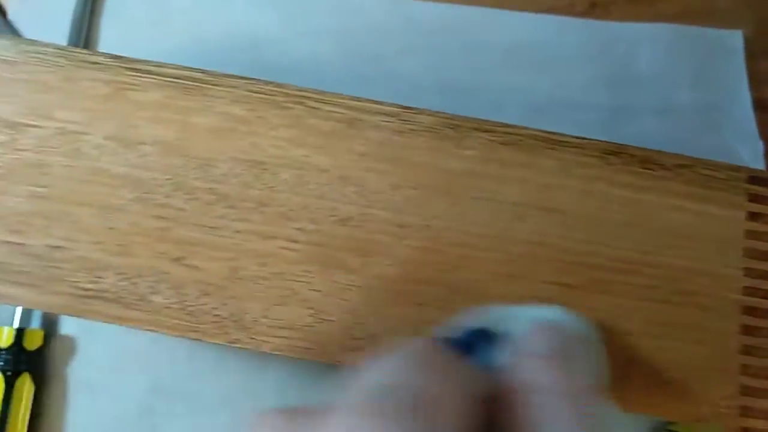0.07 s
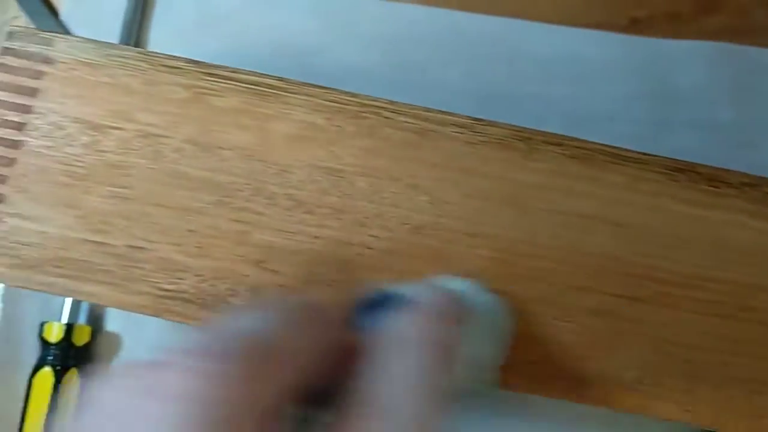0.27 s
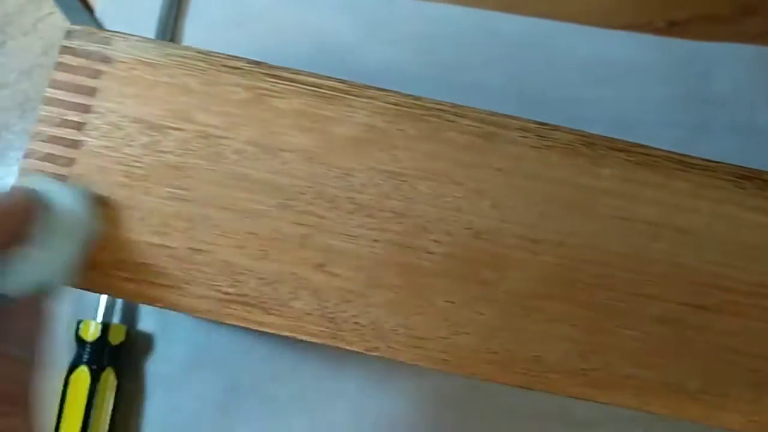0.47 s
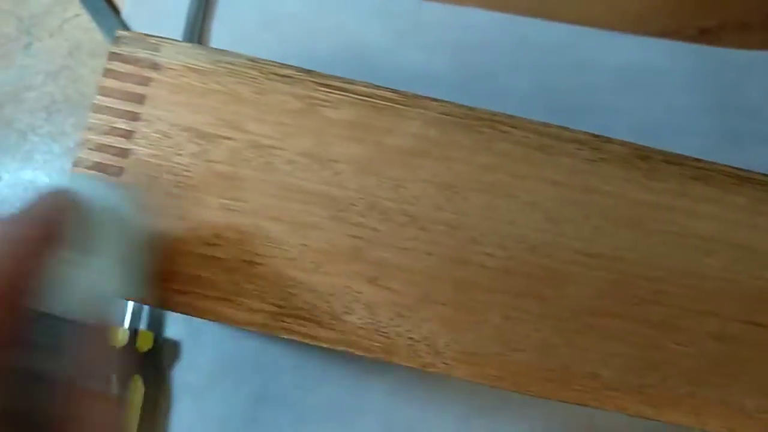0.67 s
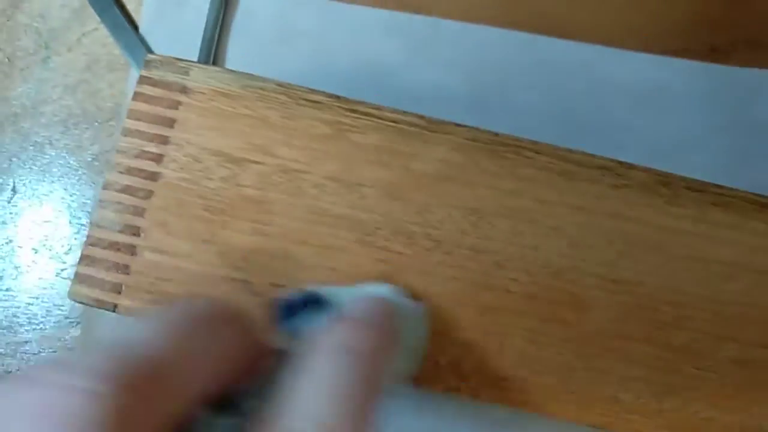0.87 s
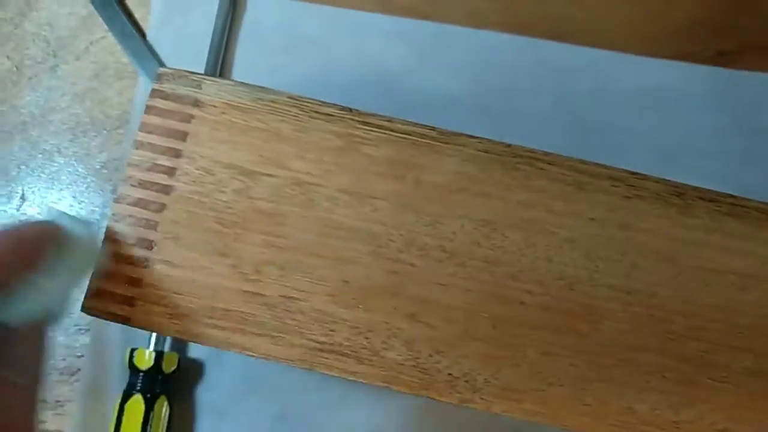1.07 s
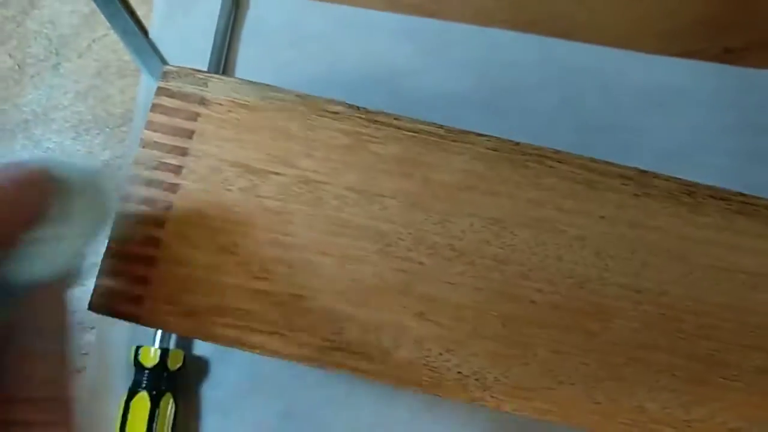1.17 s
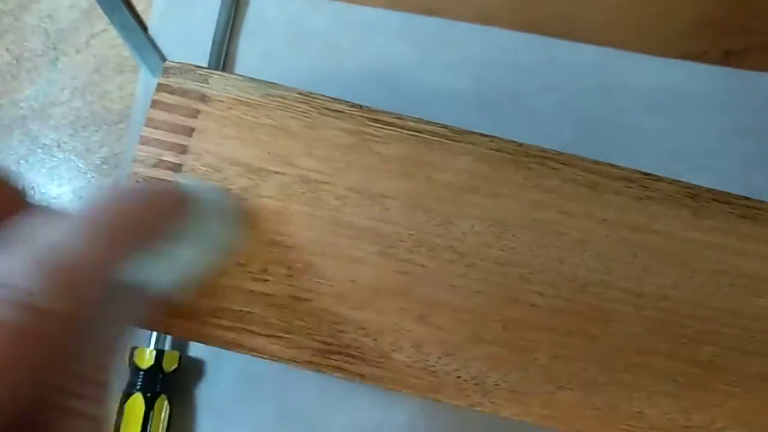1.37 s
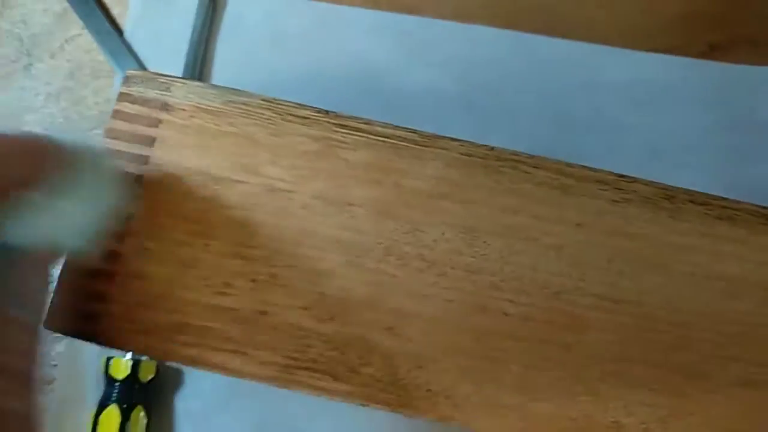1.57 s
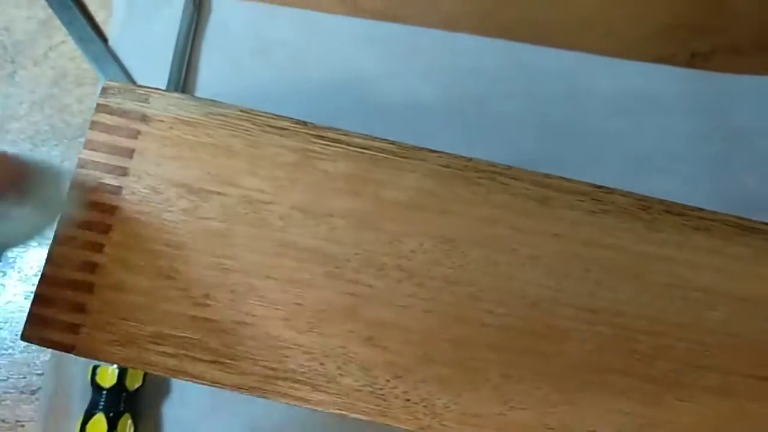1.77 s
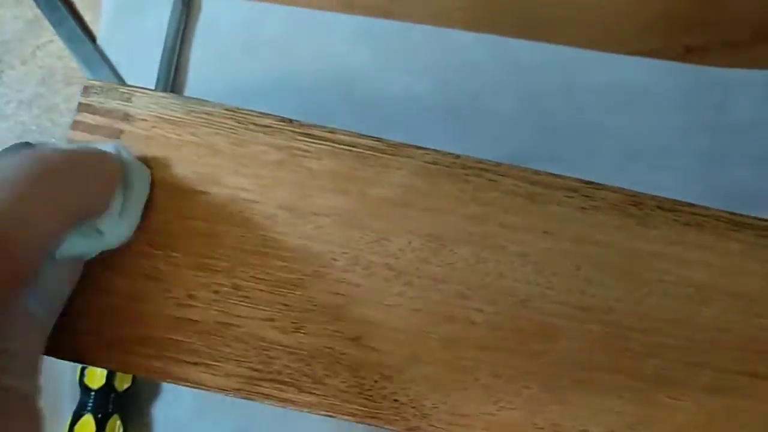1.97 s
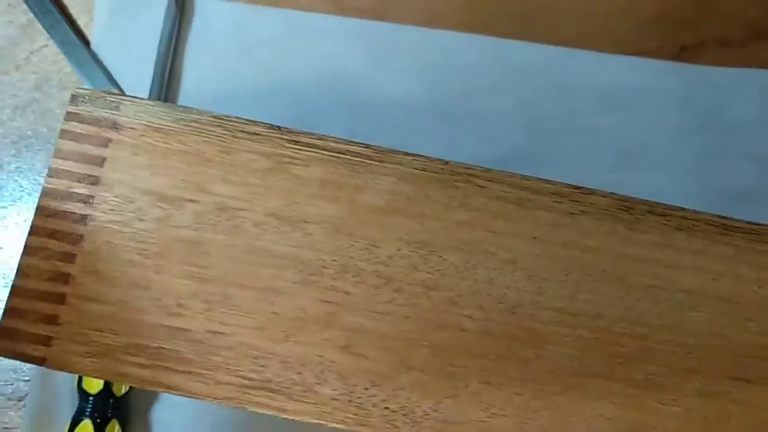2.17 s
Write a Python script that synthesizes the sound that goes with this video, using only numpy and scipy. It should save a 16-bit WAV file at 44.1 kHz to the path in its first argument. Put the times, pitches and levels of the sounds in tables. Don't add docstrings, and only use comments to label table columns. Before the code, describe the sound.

Cloth wiping over wood: two long soft swishes, then short brisk ones with tiny clicks

```python
import sys
import numpy as np
from scipy import signal
from scipy.fft import rfft, irfft, next_fast_len
from scipy.io import wavfile
from scipy.ndimage import uniform_filter1d, map_coordinates

SR = 44100
rng = np.random.default_rng(int(sys.argv[2]) if len(sys.argv) > 2 else 0)


def put_to_file(sound):
    columns = np.atleast_2d(sound).T
    safe = np.clip(columns, -1, 1)
    whole_steps = np.round(safe * 32767)
    wavfile.write(sys.argv[1], SR, whole_steps.astype(np.int16))


def nominal_scale(level):
    x = np.asarray(level, float) / 20
    return 10 ** x


N = 98475


def level(x, db):
    return x * nominal_scale(db) / np.sqrt(np.mean(x ** 2))


def colour(x, points):
    size = next_fast_len(N + 4096)
    hz, db = np.array(points, float).T
    f = np.maximum(np.arange(size // 2 + 1) * SR / size, 1)
    gain_db = np.interp(np.log(f), np.log(hz), db, left=-70, right=-70)
    return irfft(rfft(x, size) * nominal_scale(gain_db), size)[:N]


def band(x, hz, width_hz):
    b, a = signal.iirpeak(min(hz, .45 * SR), hz / width_hz, fs=SR)
    return signal.lfilter(b, a, x)


def gliding(x, hz, width_hz, order=1):
    turn = np.exp(2j * np.pi * np.cumsum(hz) / SR)
    b, a = signal.butter(order, width_hz / 2, fs=SR)
    return 2 * np.real(turn * signal.lfilter(b, a, x / turn))


def walk(rate):
    hold = int(SR / rate)
    steps = np.repeat(rng.standard_normal(N // hold + 1), hold)
    return 1.74 * uniform_filter1d(uniform_filter1d(steps, hold), hold)[:N]


def shop_air():
    # (frequency [Hz], level [dB per Hz])
    air_spectrum = [(24, -9), (45, -3.5), (260, -7.5), (600, -10.5), (2400, -16), (5500, -18.5),
                    (12000, -17), (16500, -18.5)]
    t = np.arange(N) / SR
    air = level(colour(rng.standard_normal(N), air_spectrum), -64.5)
    swell_db, fade_db_per_s = 0.4, 2
    bass_gain = nominal_scale(swell_db * walk(2.7) + fade_db_per_s * (1 - t))
    return air + (bass_gain - 1) * band(air, 320, 450)


def fan():
    # (frequency [Hz], width [Hz], level [dB])
    fan_tones = [
        (130, 18, -88),
        (265, 22, -84.5),
        (600, 28, -81),
    ]
    return sum(level(band(rng.standard_normal(N), hz, width_hz), db) for hz, width_hz, db in fan_tones)


def mains_hum():
    hz = 50 * (1 + .02 * walk(6.5))
    hum = np.sin(2 * np.pi * np.cumsum(hz) / SR) * nominal_scale(1.5 * walk(10))
    return level(hum, -74.5)


def phone_hiss():
    return level(band(rng.standard_normal(N), 9400, 3000), -70.5)


def thread_ticks():
    # (time [s], peak level [dB], pitch [Hz])
    snaps = [(.7154, -49, 8500), (.7283, -48, 8500), (.7893, -53, 9000), (0.8954, -42, 7900),
             (.9356, -50, 8500), (1.381, -49, 8400), (1.402, -51, 9220), (1.449, -47, 8900),
             (1.6289, -51, 9000), (1.961, -44, 10500), (1.9953, -53, 9000), (2.0388, -47, 11800),
             (2.1276, -52, 9000)]
    t60_s = 0.0068
    out, t = np.zeros(N + 1300), np.arange(1300) / SR
    for s, db, hz in snaps:
        burst = rng.standard_normal(len(t)) * nominal_scale(-60 * t / t60_s) + 3.0 * (t == 0)
        pitched = band(band(burst, hz, hz / 7), hz, hz / 7)
        burst = pitched + 0.31 * band(burst, 8000, 9000) + .3 * band(burst, 2200, 900)
        start = int(s * SR)
        out[start:start + len(t)] += burst / abs(burst).max() * nominal_scale(db)
    return out[:N]


def grain_snags():
    # (time [s], peak level [dB])
    snags = [(.0297, -27), (.4488, -34), (.6767, -35), (1.0134, -35), (1.1642, -25), (1.5703, -36),
             (1.8411, -26), (1.8612, -29), (1.9059, -33), (1.9116, -25), (1.9339, -32), (2.172, -37),
             (2.1964, -26), (2.2252, -24.5)]
    out, t = np.zeros(N + 1300), np.arange(1300) / SR
    impulse = 1. * (t == 0)
    click = band(impulse, 8800, 3500) + 0.47 * band(impulse, 2700, 2500)
    for s, db in snags:
        start = int(s * SR)
        out[start:start + len(t)] += click / abs(click).max() * nominal_scale(db)
    return out[:N]


def fibre_slips():
    slips_per_s, spread_db, top_db, grip_db = 14000, 1.5, 14, 0.26
    hit = rng.random(N) < slips_per_s / SR
    size_db = np.minimum(spread_db * rng.exponential(size=N), top_db)
    grip = grip_db * walk(150).clip(-3, 1.8)
    return hit * nominal_scale(size_db + grip) * np.sign(rng.standard_normal(N))


def board_ring(force):
    # (time [s], frequency [Hz])
    ring_pitch = [(0, 2220), (.168, 2050), (.27, 2200), (.33, 2270), (.526, 2110), (.6, 2150), (.7, 2300),
                  (.95, 2160), (1.056, 2080), (1.142, 2200), (1.24, 2140), (1.46, 2370), (1.5, 2290),
                  (1.86, 2280), (1.95, 2130), (2.07, 2180), (2.233, 2210)]
    t = np.arange(N) / SR
    hz = np.interp(t, *np.array(ring_pitch).T)
    wide = level(gliding(force, hz, 400, order=2), 0)
    slim = level(gliding(force, hz, 190, order=2), 0)
    at_end = np.clip((t - 1.11) / .04, 0, 1)
    flicker_db = 2.5 * walk(39.97)
    ring = ((1 - at_end) * wide + at_end * slim) * nominal_scale(flicker_db)
    skirt = band(band(force, 1716, 1360), 1716, 1360)
    ring_db, skirt_db = -7.5, -9
    return level(ring, ring_db) + level(skirt, ring_db + skirt_db)


def stroke_gains():
    # (time [s], level [dB], board pressure [dB], board ring [dB], fine hiss [dB])
    long_wipes = [
        [(0, -41.5, -12.5, -15, -2), (.014, -39.5, -11.5, -26, -2), (.068, -35, -12.5, -12, -10.5),
         (.15, -39.5, -7.5, -11, -1), (.19, -38.5, -9, -21, -4.5), (.245, -42, -12, -11.5, -9),
         (.27, -51.5, -6.5, -17, -10), (.29, -63, -10, -6, -8)],
        [(.29, -64, -7, -12, -8), (.312, -60.5, -5, -3, -6), (.336, -47.5, -6.5, 1.5, -4.5),
         (.43, -41.5, -8.5, -9, -8.5), (.51, -40.5, -6.5, -3, -4), (.59, -39.5, -7.5, -18, -10),
         (.676, -43, -8.5, -17, -14), (.71, -57.5, -9, -13, -12), (.77, -79, -6, -10, -8)],
    ]
    short_wipe = [
        [(1.0, -55, -6, -8, -5), (1.012, -42.5, -9, -15, -4), (1.05, -41, -10.5, -7, -3),
         (1.1, -39, -9, -14.5, -4), (1.15, -38, -10, -8.5, -9.5), (1.19, -35.5, -8.5, -17, -11.5),
         (1.22, -43, -10.5, -9, -9), (1.25, -57.5, -11, -3, -16), (1.3, -72, -11, -7, -8)],
    ]
    flicks = [
        [(1.44, -69, -2.5, -10, -4), (1.478, -43, -3.5, -14, -8), (1.522, -37, 0, -18, -12),
         (1.556, -33.5, -5, -19, -14), (1.588, -43, -7, -20, -9), (1.6, -56, -11, -9, -12),
         (1.66, -71, -9, -5, -5)],
        [(1.805, -67, -5, -15, -13), (1.834, -45.5, -3, -14, -10), (1.852, -36.5, -2.5, -7, -12),
         (1.88, -33, -1, -8, -14), (1.912, -35, -8, -13, -11.5), (1.932, -40, -5, -31, -12),
         (1.943, -51.5, -20, -6, -9), (2.0, -72, -7, 1, -10)],
        [(2.14, -60, -4, -8, -16), (2.165, -49.5, -1, -14, -14), (2.172, -41, -1.5, -15, -15),
         (2.21, -33, -6.5, -14, -14), (2.233, -40, -9.5, -20, -10)],
    ]
    grazes = [
        [(.86, -69, -12, -7, -8), (.89, -64, -2, -1, -10), (.92, -68, -5, -10, -16), (.933, -54.5, -5, -16, -4),
         (.95, -61, -5, -9, -6), (1.0, -57.5, -4.5, -5, -10)],
        [(1.32, -72, -12, -12, -4), (1.374, -68, -8, -12, -10), (1.38, -62, -5.5, -10, -10),
         (1.404, -69, -5, -9, -10), (1.415, -76, -4, -12, -10)],
        [(1.766, -85, -4, -13, -8), (1.774, -61, -4.5, -17, -13), (1.82, -59.5, -6, -15, -12)],
        [(2.066, -82, -12, -10, -14), (2.071, -49, -9.5, -20, -12), (2.088, -46.5, -9, -8, -14),
         (2.1, -51.5, -7, -8, -13), (2.14, -61.5, -5, -15, -13)],
    ]
    t = np.arange(N) / SR
    power = np.zeros((4, N))
    for rows in long_wipes + short_wipe + flicks + grazes:
        s, db, *shares_db = np.array(rows, float).T
        stroke_db = np.interp(t, s, db, left=-120, right=-120)
        parts_db = np.array([0 * t] + [np.interp(t, s, share) for share in shares_db])
        power += nominal_scale(stroke_db + parts_db) ** 2
    return np.sqrt(uniform_filter1d(power, size=90, axis=1).clip(0))


def grain_patches(x):
    spec, f = rfft(x), np.arange(N // 2 + 1) * SR / N
    out = np.zeros(N)
    for centre_hz in 100 * 2 ** np.arange(0, 7.5, .2):
        octaves_off = abs(np.log2(f + 1) - np.log2(centre_hz))
        window = np.clip(1 - octaves_off / .2, 0, 1)
        out += irfft(spec * window, N) * nominal_scale(.5 * walk(18))
    return out


def cloth_folds(x):
    # (time [s], length [s], frequency [Hz], width [Hz], level [dB])
    fold_moves = [(-.06, 0.15, 12900, 2200, -7), (.21, 0.074, 12900, 2000, 4.5),
                  (0.236, 0.054, 3180, 1500, 1), (.32, 0.1, 3450, 500, 4), (.32, .12, 8000, 1200, 4.5),
                  (0.537, 0.097, 3000, 900, -2), (1.0, 0.091, 12200, 1600, -0.5),
                  (1.832, 0.064, 5400, 1600, -6.5), (1.846, .07, 4260, 500, 3),
                  (1.858, 0.094, 1680, 500, -4.5), (2.07, 0.06, 12000, 2400, -9),
                  (2.065, .05, 14600, 700, 3), (2.068, 0.063, 5500, 2000, 4.5), (2.15, .06, 11900, 1400, 3),
                  (.33, .14, 12400, 1400, 3), (1.793, 0.064, 7300, 800, 5.5),
                  (2.075, 0.041, 2200, 300, 4.5), (1.843, .08, 800, 800, -3), (.1, .1, 3000, 1000, -2),
                  (1.5, .08, 2100, 600, -2)]
    t, out = np.arange(N) / SR, x.copy()
    for s, length, hz, width_hz, db in fold_moves:
        swell = np.abs(np.sin(np.pi * np.clip((t - s) / length, 0, 1))) ** .5
        out += (nominal_scale(db) - 1) * swell * band(x, hz, width_hz)
    return out


def cupped_fingers(rub):
    # (time [s], cupping [0-1], hollow resonance [Hz])
    cupping = [(0, 0.8, 10600), (.12, 0.26, 10700), (.22, 0.7, 10740), (.33, 1, 10400), (.42, 0.93, 10440),
               (.53, 0, 10500), (.62, 0.2, 10700), (1.0, .7, 10500), (1.1, 0.2, 10700), (1.16, 0.37, 10700),
               (1.5, 0.28, 10600), (1.86, 0.2, 10600), (2.233, 0.28, 10500)]
    t = np.arange(N) / SR
    s, share, hz = np.array(cupping).T
    cup, hollow_hz = np.interp(t, s, share).clip(0, 1), np.interp(t, s, hz)
    hollow = nominal_scale(4) * gliding(rub, hollow_hz, 500, order=2)
    shade = 0.48 * band(rub, 6200, 2700)
    notch = 0.37 * gliding(rub, 0.92 * hollow_hz, 410)
    return rub + cup * (hollow - shade - notch)


def hand_echo(rub):
    delay_s, move_s, echo_db = 0.000592, .00002, -19.5
    late = np.arange(N) - (delay_s + move_s * walk(5.8)) * SR
    echo = map_coordinates(rub, [late], mode="nearest")
    return (rub + nominal_scale(echo_db) * echo) / np.sqrt(1 + nominal_scale(echo_db) ** 2)


def cloth():
    # (frequency [Hz], level [dB per Hz])
    board_spectrum = [(110, -27), (450, -21), (1300, -14), (1900, -3), (2900, 1.5), (4300, -1), (5800, -2),
                      (8000, -12)]
    weave_spectrum = [(4000, -19.5), (6300, -10), (7600, -6), (8900, -2), (9700, -2.5), (10500, -7),
                      (11500, -9), (13000, -46)]
    fine_spectrum = [(9500, -25), (11400, -5), (12500, -0.5), (14500, 0.5), (15800, -6)]
    force = fibre_slips()
    board = level(colour(force, board_spectrum), 0)
    ring = board_ring(force)
    weave = level(colour(fibre_slips(), weave_spectrum), -1.67)
    fine = level(colour(fibre_slips(), fine_spectrum), 0)
    rub = np.sum(stroke_gains() * [weave, board, ring, fine], axis=0)
    rub = cloth_folds(grain_patches(rub))
    return hand_echo(cupped_fingers(rub))


def room_tail(near):
    t60_s, tail_db = 0.15, -17.5
    t = np.arange(SR // 3) / SR
    tail = band(rng.standard_normal(len(t)), 7100, 10000) * nominal_scale(-60 * t / t60_s) * (t > .003)
    return nominal_scale(tail_db) * signal.fftconvolve(near, tail / np.sqrt(np.sum(tail ** 2)))[:N]


def scene():
    shop = shop_air() + fan() + mains_hum() + phone_hiss()
    near = cloth() + thread_ticks() + grain_snags()
    mid = near + room_tail(near) + shop
    return np.array([mid, mid])


def roll_off(x):
    return signal.sosfilt(signal.butter(12, 16220, fs=SR, output="sos"), x)


def record(dry):
    # (time [s], length [s], frequency [Hz], width [Hz], level under the sound [dB])
    side_patches = [(0.603, 0.045, 9950, 1490, -3), (0.61, .04, 11600, 1400, -2),
                    (1.083, 0.042, 5370, 1780, -5.5), (1.303, .04, 5000, 1500, -3),
                    (1.303, .04, 7300, 2000, -3), (1.653, .04, 9700, 1500, -3),
                    (1.73, 0.048, 6300, 1200, -3), (1.73, 0.047, 8300, 1400, -6),
                    (1.73, 0.049, 11800, 1400, -4), (1.73, 0.05, 13800, 1500, -7)]
    t = np.arange(N) / SR
    top_cut = signal.ellip(10, .2, 70, 15800, fs=SR, output="sos")
    x = signal.sosfilt(top_cut, dry * np.clip(t / 0.0023, 0, 1))
    delayed = np.roll(x[0], 300)
    side = np.zeros(N)
    for s, length, hz, width_hz, db in side_patches:
        edges_hz = [hz - width_hz / 2, hz + width_hz / 2]
        sos = signal.butter(6, edges_hz, "bandpass", fs=SR, output="sos")
        gate = np.clip(np.minimum(t - s, s + length - t) / 0.011, 0, 1) ** 2
        side += nominal_scale(db) * gate * signal.sosfilt(sos, delayed)
    return roll_off(x + side * np.array([[1], [-1]]))


dry = scene()
out = record(dry)
put_to_file(out)
```